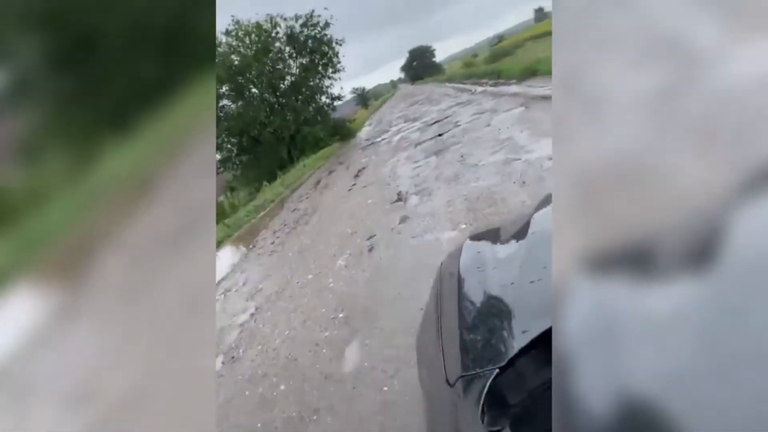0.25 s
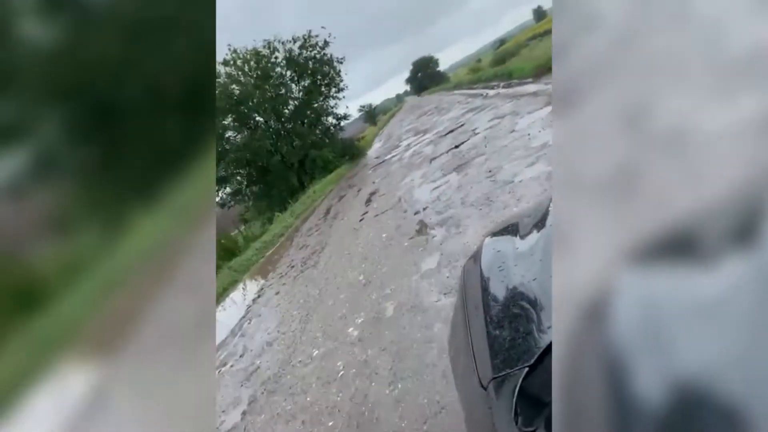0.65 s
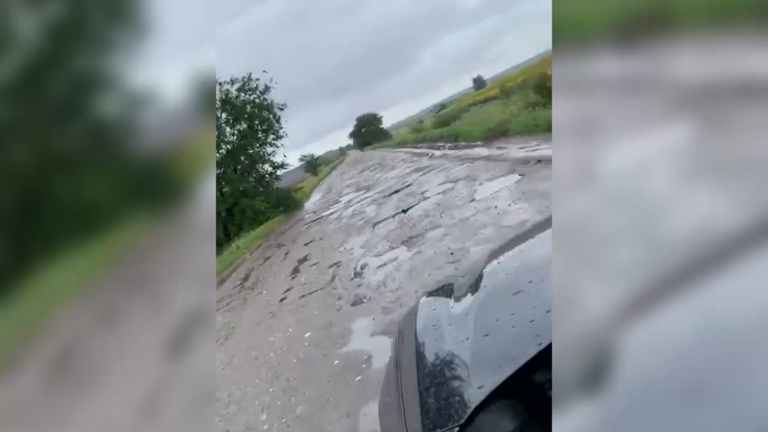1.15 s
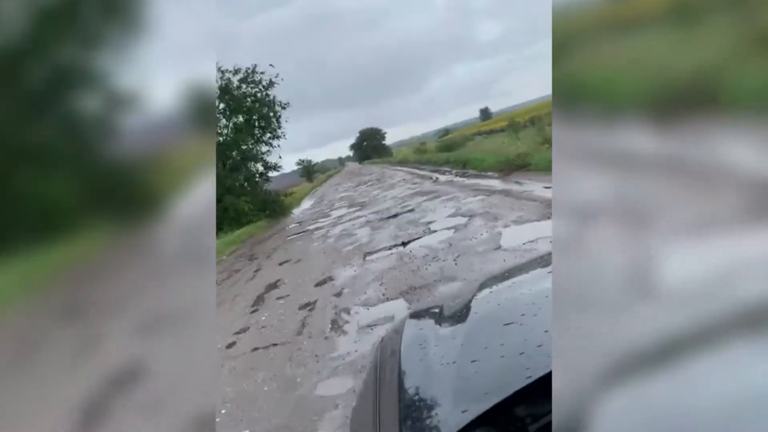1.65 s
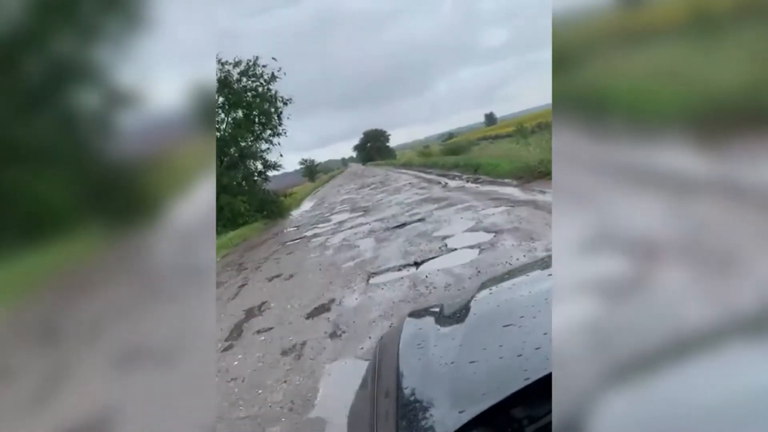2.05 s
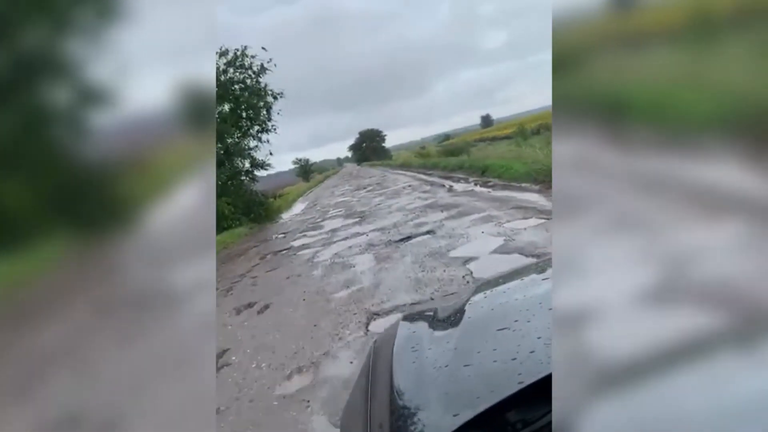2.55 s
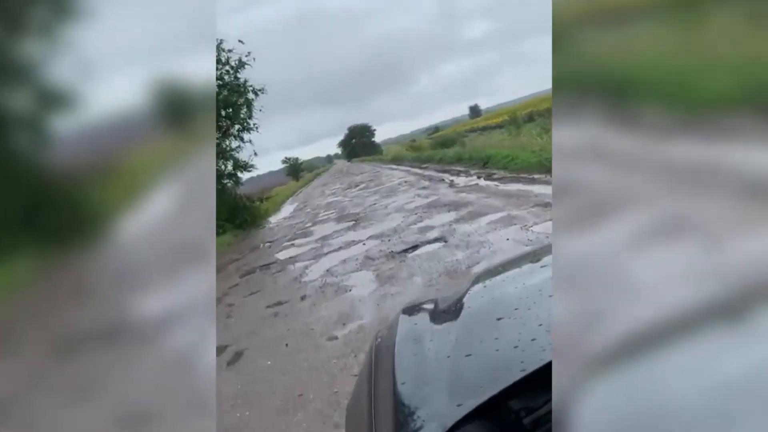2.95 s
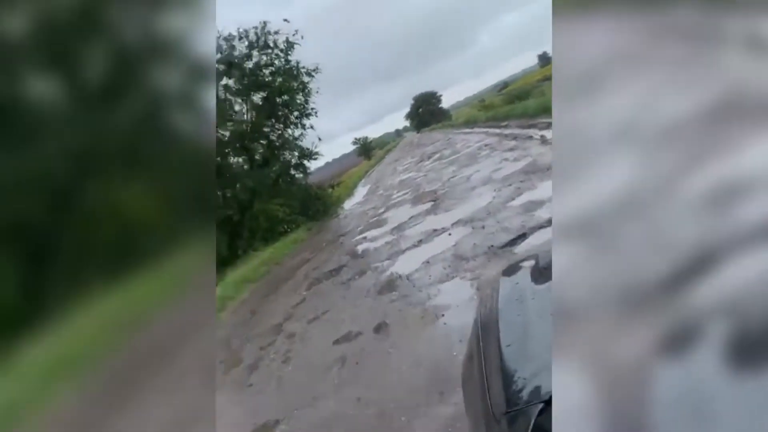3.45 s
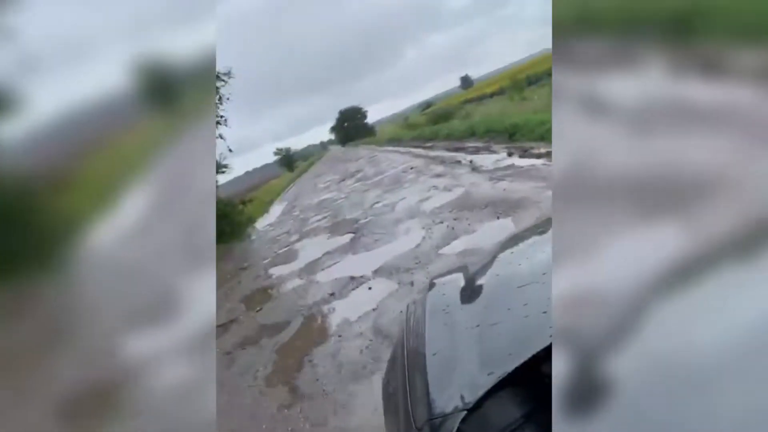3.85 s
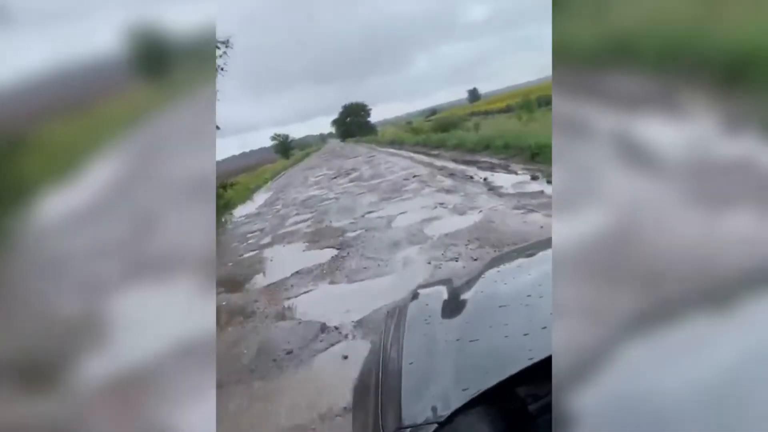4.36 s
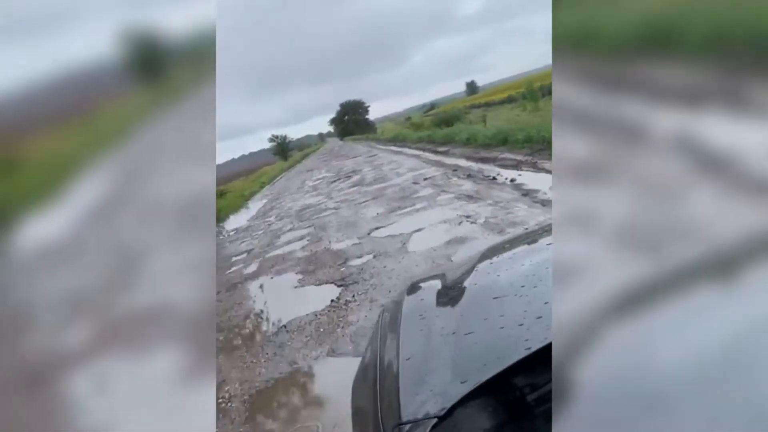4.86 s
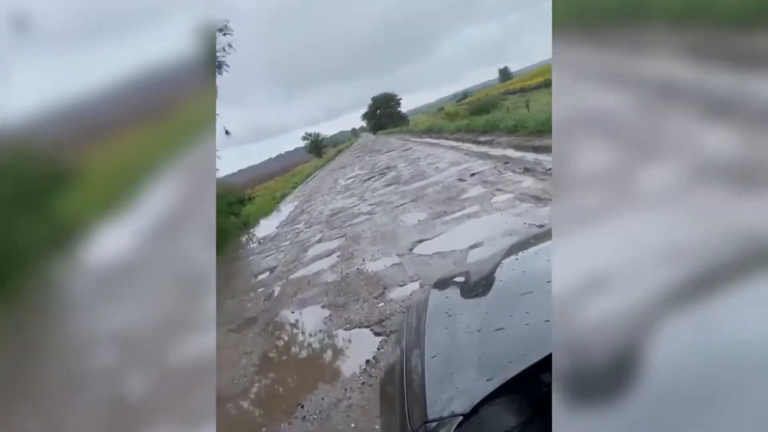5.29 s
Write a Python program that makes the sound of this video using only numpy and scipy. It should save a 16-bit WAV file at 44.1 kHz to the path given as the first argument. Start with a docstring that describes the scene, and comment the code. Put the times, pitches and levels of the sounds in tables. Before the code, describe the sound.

A car rolls slowly over a broken, wet road, heard outdoors and dry from one microphone close to the bodywork. A deep body and wind rumble and dull tyre drone run throughout, with fine gritty crunching, ticking pebbles and a very faint watery hiss. At 0.3 s a very loud, bright knock snaps through the sheet metal, followed at 0.4 s by a duller thump; another hollow thud comes at 1 s. From 1.1 to 2.2 s it is mostly rolling with light taps. Softer low bumps and stone clicks start at 2.3 s, and grit and small squelches thicken around 2.7-3 s. A deep boom at 3.2 s leads to a dense, clattering burst of knocks, stones and spray at 3.4-3.55 s. Then it calms, with modest bumps at 3.9 and 4.3 s and quiet rolling, until heavy booming thuds at 5.3 and 5.5 s.

```python
"""A car creeps over a wet, broken road, heard from one microphone held outside, close to the bodywork.
Body and wind rumble and the tyre drone are coloured noise; the treads crunch on grit (noise, ticks and pips),
hiss on the water film and throw spray (noise). Blows and stones reach the microphone through the sheet metal
as bending waves, treble first, so each lands as a quick falling chirp. Swinging parts boom as decaying sines;
water squelches from hollows as resonant noise."""
import sys
import numpy as np
from scipy import signal
from scipy.fft import rfft, irfft, next_fast_len
from scipy.io import wavfile
from scipy.ndimage import uniform_filter1d, map_coordinates

SR = 44100
rng = np.random.default_rng(int(sys.argv[2]) if len(sys.argv) > 2 else 0)


def generate_wav(signal):
    """Clip the signal to [-1, 1] and save it as 16-bit WAV at the path in sys.argv[1]."""
    frames = np.transpose(np.atleast_2d(signal))
    scaled = np.clip(frames, -1, 1) * 32767
    pcm = np.round(scaled).astype(np.int16)
    wavfile.write(sys.argv[1], SR, pcm)


N = 243608

# how hard the road shakes the car: [t/s, shake level/dB]
ROAD_SHAKE = [(0.0, -43.5), (0.57, -43.5), (1.03, -37), (2.37, -37), (2.83, -33), (4.17, -42.5),
              (4.44, -39.5), (5.22, -39.5), (5.5, -35)]
# looseness of the surface under the tyres: [t/s, grit level before trim/dB]
SURFACE = [(0.0, -53), (0.32, -60), (0.47, -56), (2.32, -52.5), (2.77, -46.5), (3.0, -48.5), (3.21, -56.5),
           (3.4, -47.5), (3.55, -45), (3.71, -52.5), (4.18, -57.5), (4.42, -54), (4.6, -57), (5.24, -54),
           (5.28, -48.5), (5.47, -56), (5.52, -44)]
# the film of water under the tread: [t/s, hiss level before flicker/dB]
WETNESS = [(0.0, -77.5), (0.75, -77.5), (1.6, -79), (1.8, -74), (2.55, -74), (2.8, -69.5), (3.26, -72),
           (3.45, -73.5), (3.6, -70), (3.82, -78.5), (4.25, -78), (4.4, -73), (4.72, -77), (4.93, -70),
           (5.23, -80), (5.35, -66), (5.52, -68)]
# relative spectra of the rolling layers: [f/Hz, level per Hz/dB]
RUMBLE_SPECTRUM = [(11, -34), (18, -9), (43, 1), (70, -9), (110, -17), (140, -37.5), (240, -120)]
DRONE_SPECTRUM = [(45, -24), (75, -2.5), (110, -1), (200, -9.5), (300, -15.5), (450, -25.5), (650, -40),
                  (1000, -49.5)]
GRIT_SPECTRUM = [(300, -1.5), (550, 0), (800, -4.5), (1300, -1), (1700, -5.5), (2200, -9), (2700, -19.5),
                 (3300, -22), (4100, -29), (4800, -42.5), (7000, -48.5)]
HISS_SPECTRUM = [(1500, -30.5), (3000, 1), (4100, 4), (4700, -3.5), (5500, -5.5), (6400, -5.5),
                 (7100, -12.5), (8500, -15), (10500, -26.5), (13000, -42)]
SPRAY_SPECTRUM = [(1500, -30), (3000, 7), (4200, 1.5), (5200, -6.5), (6500, -8.5), (8500, -14.5),
                  (10500, -25), (13000, -38.5)]
# water and grit thrown from puddles, bell-shaped in time:
# [t of the peak/s, half length/s, spray level/dB, grit level/dB], both before flicker
SPLASHES = [(0.199, 0.054, -65, -50), (0.385, 0.072, -63, -51.5), (0.68, 0.02, -88, -53.5),
            (0.812, 0.013, -79, -47.5), (0.875, 0.022, -76, -51), (0.98, 0.048, -70, -55),
            (1.282, 0.056, -92, -53), (1.6, 0.01, -92, -52), (1.998, 0.029, -73, -56),
            (2.16, 0.0068, -63, -52.5), (2.703, 0.013, -81, -46), (2.808, 0.017, -65, -48),
            (2.936, 0.011, -73, -43.5), (3.13, 0.12, -68, -50), (3.413, 0.0073, -60, -38),
            (3.457, 0.02, -69, -49), (3.533, 0.014, -61.5, -43.5), (3.573, 0.015, -74, -52),
            (3.701, 0.015, -78, -42), (3.971, 0.078, -68, -52), (4.13, 0.029, -72.5, -55),
            (4.294, 0.0069, -59, -42.5), (4.347, 0.026, -72, -50), (4.465, 0.013, -78, -53),
            (4.876, 0.039, -80, -52), (5.067, 0.012, -82, -51.5), (5.333, 0.01, -63, -45),
            (5.42, 0.043, -78, -48), (5.491, 0.003, -60, -49)]
# the wheel goes light for a moment: [t of the middle/s, half length/s]
LIFT = (3.355, 0.028)
# wheels strike pothole edges: [t/s, peak level/dB, hardness corner f/Hz, crunch level/dB,
# crunch length/s, travel to the microphone at 1 kHz/s]
BLOWS = [ (0.2722, -3.5, 1550, -33, 0.081, 0.0034), (0.3836, -9, 358, -18.5, 0.043, 0.0029),
         (0.3944, -17.5, 450, -27, 0.016, 0.0029), (0.409, -20.5, 350, -35, 0.011, 0.0029),
         (0.547, -42, 600, -37, 0.008, 0.003), (0.798, -35.5, 600, -38, 0.085, 0.003),
         (0.916, -33.5, 500, -32, 0.033, 0.0035), (0.981, -20, 298, -24.5, 0.063, 0.0041),
         (1.176, -31, 700, -44.5, 0.068, 0.0028), (1.234, -28, 1430, -42, 0.032, 0.0022),
         (1.641, -43, 453, -44, 0.011, 0.003), (2.086, -47, 450, -51, 0.011, 0.003),
         (2.279, -35, 400, -39, 0.049, 0.003), (2.412, -17, 156, -49, 0.035, 0.0031),
         (2.653, -19, 178, -29, 0.024, 0.0031), (2.713, -22.5, 200, -28.5, 0.014, 0.0031),
         (2.787, -35, 1100, -33, 0.013, 0.0031), (2.791, -20, 120, -30, 0.024, 0.00294),
         (3.02, -35, 1320, -28, 0.012, 0.0024), (3.076, -39, 900, -37, 0.066, 0.0028),
         (3.178, -34, 600, -24, 0.018, 0.0029), (3.183, -19.5, 480, -31, 0.0069, 0.0021),
         (3.31, -31, 350, -38, 0.019, 0.003), (3.408, -21, 500, -16.5, 0.015, 0.0026),
         (3.4132, -12, 486, -19, 0.034, 0.0031), (3.418, -17.5, 1000, -38.5, 0.0093, 0.002785),
         (3.427, -15.5, 407, -34, 0.027, 0.00293), (3.505, -23, 1400, -33, 0.035, 0.0027),
         (3.5255, -26, 304, -21.5, 0.013, 0.00318), (3.541, -31, 1000, -35, 0.015, 0.003),
         (3.902, -29.5, 554, -30, 0.041, 0.0036), (3.922, -29, 500, -28, 0.059, 0.0031),
         (3.934, -29, 900, -39, 0.015, 0.003), (4.184, -29, 1160, -39.5, 0.06, 0.0026),
         (4.2682, -27.5, 910, -35, 0.018, 0.0024), (4.292, -33, 1200, -40, 0.028, 0.0031),
         (4.814, -43, 795, -36, 0.02, 0.003), (5.327, -25, 745, -23, 0.018, 0.0031),
         (5.332, -23, 750, -30, 0.014, 0.003), (5.339, -17.5, 128, -25.5, 0.028, 0.0034),
         (5.4372, -26.5, 1100, -30, 0.034, 0.0032), (5.493, -17.5, 124, -16, 0.015, 0.003)]
# response of the bodywork: [f/Hz, level/dB]
PANEL = [(15, -18.5), (35, 2.5), (120, 6), (250, 5), (1000, 5), (2000, 1), (2700, -10), (4200, -18.5),
         (8000, -26.5), (12000, -44.5)]
# bending waves return from the panel's edges: [path relative to the direct one, level/dB before treble loss]
REFLECTIONS = [(2.102, -8), (3.3, -12)]
# stones flung against the bodywork: [t/s, peak level/dB, treble tilt/dB per octave]
STONES = [(.2730, -18, 1), (1.6380, -34, -6), (2.3500, -45, 3), (2.4146, -21, 1), (2.6512, -26, -2),
          (2.7425, -28, -3), (2.7835, -29, -2), (2.8215, -31, -2), (2.9400, -37, 2), (2.9540, -33, -1),
          (3.0215, -29, -1), (3.0775, -29, -2), (3.1140, -36, 0), (3.2760, -40, 2), (3.4146, -20, -2),
          (3.4302, -22, 2), (3.4938, -47, 7), (3.5064, -31, 1), (3.5260, -30, 4), (3.5342, -23, 2),
          (4.0310, -36, 0), (4.1200, -36, 0), (4.4625, -36, -2), (5.1200, -45, 4), (5.2650, -32, 1),
          (5.4378, -30, -2), (5.5157, -19, 3)]
# relative spectrum of a stone's chirp before its tilt: [f/Hz, level/dB]
STONE_SPECTRUM = [(40, -21), (200, -10.5), (400, 5), (700, -5.5), (1300, 4), (2000, -6), (2600, -12),
                  (4000, -22), (5500, -28), (8000, -47.5), (12000, -59.5)]
# a jolt sets a part swinging, body, wheel or loose strut: [t/s, peak level/dB, pitch f/Hz]
DROPS = [(0.282, -17.5, 103), (0.299, -19, 40.8), (0.391, -12, 170), (0.4, -26, 42), (0.9866, -16, 256),
         (0.996, -15.5, 43.6), (1.012, -30, 255), (1.153, -31.5, 365), (1.934, -28, 200),
         (2.327, -21.5, 47.4), (2.49, -22.5, 44.2), (2.758, -18.5, 80), (3.02, -19.5, 115),
         (3.084, -25.5, 86), (3.1825, -15.5, 382), (3.192, -8, 40.3), (3.418, -17.5, 138),
         (3.4207, -11.5, 220), (3.4204, -17.5, 328), (3.424, -9.5, 40.8), (3.531, -17.5, 326),
         (3.533, -16.5, 84), (3.924, -21, 107), (3.963, -22.5, 99), (4.298, -27, 130), (4.342, -20.5, 48),
         (5.338, -18.5, 134), (5.345, -10, 39), (5.498, -13, 105.3), (5.502, -9.5, 59.8)]
# a tyre squeezes water out of a hollow: [t of the peak/s, rms level/dB, half length/s, pitch f/Hz]
SQUELCHES = [(0.973, -46, 0.0013, 1930), (1.912, -46, 0.013, 1580), (2.288, -36, 0.0037, 1440),
             (2.694, -44, 0.0059, 1900), (2.72, -46, 0.0084, 1550), (2.743, -37, 0.0018, 1400),
             (2.803, -41.5, 0.0052, 1750), (2.807, -38, 0.011, 1220), (2.958, -41.5, 0.002, 1700),
             (3.093, -42.5, 0.0081, 1330), (3.141, -38.5, 0.0017, 1310), (3.33, -46.5, 0.0062, 1400),
             (3.401, -38.5, 0.0023, 1940), (4.05, -44, 0.0023, 1180), (4.065, -42, 0.0027, 1170),
             (4.197, -42, 0.009, 1010), (4.313, -47.5, 0.0092, 1400), (4.854, -48.5, 0.0037, 1250),
             (5.082, -47, 0.0036, 1040), (5.322, -39.5, 0.0021, 1350), (5.398, -50.5, 0.066, 2050)]

DRONE_DB = 0.5  # over the shake
RUMBLE_DB, RUMBLE_FOLLOWS = 7.0, 0.43  # over the mean shake; share of the shake's swing in dB
GRIT_DB = -1.02  # trim on the surface level
LIFT_HISS_DB, LIFT_GRIT_DB = -8, -6.5  # change under a light wheel
# unevenness: grit follows the bumps, flickers and flares in spots; water flickers too
GRIT_BUMP_DB, GRIT_FLICKER_DB, GRIT_PATCHY_DB, WATER_FLICKER_DB = 0.9, 1.25, 2.9, 1.2
TRAVEL_S = 0.0031  # grit, from wheel to microphone at 1 kHz
# grit popping under the tread: pops a second, middle pitch, full range of pitch
POP_RATE, POP_HZ, POP_SPREAD_OCTAVES = 130, 1604, 1
POP_CYCLES, POP_DB = 4.0, -10  # a pop peaks after half these cycles; level against the grit noise
# water thrown by a blow: level against its crunch, lag and half length
BLOW_SPRAY_DB, BLOW_SPRAY_LAG_S, BLOW_SPRAY_HALF_S = -56, 0.0088, 0.013
RATTLE_RATE = 420  # mean contacts a second of loose parts after a blow
BODY_HZ = 42.7  # the body's swing; higher parts ring for more cycles
TOP_HZ = 11900  # band limit of the recorder


def amp(db):
    """Decibels to gain."""
    return 10 ** (np.asarray(db) / 20)


def unit(x):
    """Scale to rms 1."""
    return x / np.sqrt(np.mean(x ** 2) + 1e-20)


def colour(points, hz):
    """Gain of (Hz, dB) points joined on a log axis, -120 dB beyond the ends."""
    f, db = np.transpose(points)
    return amp(np.interp(np.log(hz + 1), np.log(f + 1), db, left=-120, right=-120))


def filtered(x, response):
    """x through a complex response of frequency."""
    m = next_fast_len(len(x) + 8192)  # padding keeps the tail from wrapping round
    return irfft(rfft(x, m) * response(np.fft.rfftfreq(m, 1 / SR)), m)[:len(x)]


def noise(points):
    """Coloured noise of rms 1."""
    return unit(filtered(rng.standard_normal(N), lambda hz: colour(points, hz)))


def wobble(rate):
    """A smooth random curve, rate knots a second."""
    knots = rng.standard_normal(int(N * rate / SR) + 4)
    return map_coordinates(knots, [np.arange(N) * rate / SR])


def curve(rows):
    """A two-column table as one value per sample."""
    s, values = np.transpose(rows)
    return np.interp(np.arange(N) / SR, s, values)


def swell(s, half):
    """A bell-shaped rise and fall around time s; half is its standard deviation."""
    return np.exp(-((np.arange(N) / SR - s) / half) ** 2 / 2)


def add(track, s, sound):
    """Mix a sound into the track from time s on."""
    room = track[max(round(s * SR), 0):][:len(sound)]
    room += sound[:len(room)]


def patchy(x, depth_db):
    """Shifting contact makes short spots of the spectrum flare and fade; rms 1."""
    z = signal.stft(x, nperseg=512)[2]
    field = uniform_filter1d(rng.standard_normal(z.shape), size=4, axis=0)  # across frequency
    field = uniform_filter1d(field, size=3, axis=1)  # across time
    return unit(signal.istft(z * amp(depth_db * unit(field)), nperseg=512)[1][:N])


def bending(hz, travel):
    """Phase of a bending wave: its delay is travel at 1 kHz and goes as 1 / sqrt(f)."""
    return np.exp(-4j * np.pi * travel * np.sqrt(1000 * hz))


def rumble(shake_db):
    """Low body and wind noise that swings less than the road's shake."""
    mean_db = shake_db.mean()
    level_db = RUMBLE_DB + mean_db + RUMBLE_FOLLOWS * (shake_db - mean_db)
    return amp(level_db) * noise(RUMBLE_SPECTRUM)


def drone(shake_db, bumps):
    """Tyre noise that follows the shake, the small bumps and a slower drift of its own."""
    return amp(shake_db + DRONE_DB + 1.4 * bumps + 1.0 * wobble(14)) * noise(DRONE_SPECTRUM)


def pebbles(rate, spread_db, travel):
    """Small stones of random size tick against the car and reach us as bending waves."""
    count = int(rate * N / SR)
    where, size, sign = rng.random((count, 3)).T
    # many small ones, few large
    sizes = amp(-spread_db * np.log(np.maximum(size, .04))) * np.sign(sign - .5)
    ticks = np.bincount((where * N).astype(int), sizes, N)
    return unit(filtered(ticks, lambda hz: colour(GRIT_SPECTRUM, hz) * bending(hz, travel)))


def pops(spread_db):
    """Wet grit pops out from under the tread: brief pips, each with its own pitch and size."""
    track, t = np.zeros(N), np.arange(SR // 40) / SR
    for where, size, pitch in rng.random((int(POP_RATE * N / SR), 3)):
        cycles = t * POP_HZ * 2 ** (POP_SPREAD_OCTAVES * (pitch - .5))
        life = cycles / POP_CYCLES
        pip = life * np.exp(-2 * life) * np.sin(2 * np.pi * cycles)
        add(track, where * N / SR, amp(spread_db * size ** 2) * pip)
    return unit(track)


def grit(bumps):
    """Fine sand is a shifting hiss, coarse stones tick one by one, wet grit pops; puddles throw more."""
    crunch = patchy(noise(GRIT_SPECTRUM), GRIT_PATCHY_DB)
    crunch += amp(-3) * pebbles(rate=340, spread_db=2.5, travel=TRAVEL_S)
    crunch += amp(POP_DB) * pops(spread_db=12.5)
    rolled = amp(curve(SURFACE) + GRIT_DB + LIFT_GRIT_DB * swell(*LIFT) + GRIT_BUMP_DB * bumps)
    thrown = sum(amp(grit_db) * swell(s, half) for s, half, _, grit_db in SPLASHES)
    return np.hypot(rolled, thrown) * amp(GRIT_FLICKER_DB * wobble(90)) * crunch


def hiss():
    """The water film hisses under the tread, less while the wheel is light."""
    return amp(curve(WETNESS) + LIFT_HISS_DB * swell(*LIFT)) * patchy(noise(HISS_SPECTRUM), depth_db=3.2)


def spray():
    """Water thrown from puddles, and by each blow a moment after it."""
    puddles = sum(amp(water_db) * swell(s, half) for s, half, water_db, _ in SPLASHES)
    jolts = sum(amp(crunch_db) * swell(s + BLOW_SPRAY_LAG_S, BLOW_SPRAY_HALF_S)
                for s, _, _, crunch_db, _, _ in BLOWS)
    return (puddles + amp(BLOW_SPRAY_DB) * jolts) * patchy(noise(SPRAY_SPECTRUM), depth_db=2.0)


def rolling():
    """All layers of the rolling car; the same small bumps shake drone and grit."""
    shake_db = curve(ROAD_SHAKE)
    bumps = wobble(32)
    water = amp(WATER_FLICKER_DB * wobble(130)) * (hiss() + spray())
    return rumble(shake_db) + drone(shake_db, bumps) + grit(bumps) + water


def wave(spectrum):
    """A short wave of peak 1 from its complex spectrum, eased in and out."""
    x = irfft(spectrum)
    k = np.arange(len(x))
    x = x * np.minimum(k / 30, 1) * np.cos(np.pi / 2 * k / len(x))
    return x / np.abs(x).max()


def rattle(size):
    """An uneven run of small contacts, each with its own strength and direction."""
    gap, strength, sign = rng.random((size // 30, 3)).T
    at = (np.cumsum(.5 + gap) * SR / RATTLE_RATE).astype(int)
    return np.bincount(at, (.5 + strength) * np.sign(sign - .5), size)[:size]


def knocks(crunch_bright, echo_hz):
    """Each blow chirps down through the bodywork, with a short rattle; soft blows lack treble."""
    track, t = np.zeros(N), np.arange(SR // 5) / SR
    hz = np.fft.rfftfreq(len(t), 1 / SR)
    panel = colour(PANEL, hz)
    for s, db, corner_hz, crunch_db, length, travel in BLOWS:
        direct = bending(hz, travel)
        # the low waves best survive the trip to an edge and back
        echoes = sum(amp(loss_db) * bending(hz, path * travel) for path, loss_db in REFLECTIONS)
        echoes = echoes / (1 + (hz / echo_hz) ** 2)
        chirp = wave(panel / (1 + (hz / corner_hz) ** 3.11) * (direct + echoes))
        # loose stones and parts: no deep bass, duller after a soft blow
        crunch_hz = crunch_bright * min(corner_hz, 700)
        loose = panel * hz / (hz + 120) / (1 + (hz / crunch_hz) ** 1.68)
        crunch = unit(irfft(rfft(rattle(len(t))) * loose * direct))
        hump = t * np.exp(-(2 * t / length) ** 2)
        add(track, s, amp(db) * chirp + amp(crunch_db) * hump / hump.max() * crunch)
    return track


def stones(travel):
    """A hard little stone makes one dry, bright chirp in the sheet metal."""
    track = np.zeros(N)
    hz = np.fft.rfftfreq(SR // 10, 1 / SR)
    for s, db, tilt_db in STONES:
        tilt = amp(tilt_db * np.log2(hz + 1))
        add(track, s, amp(db) * wave(colour(STONE_SPECTRUM, hz) * tilt * bending(hz, travel)))
    return track


def booms(ring_cycles, rise_cycles):
    """Body, wheel or strut swings for a few cycles after a jolt."""
    track, t = np.zeros(N), np.arange(SR // 3) / SR
    for s, db, hz in DROPS:
        cycles = hz * t
        rise = 1 - np.exp(-cycles / rise_cycles)
        decay = amp(-60 * cycles / (ring_cycles * np.sqrt(hz / BODY_HZ)))
        swing = np.sin(2 * np.pi * cycles) * rise * decay
        add(track, s, amp(db) * swing / np.abs(swing).max())
    return track


def squelches(sharpness):
    """Short swells of noise that resonate in the gap between tread and road."""
    track = np.zeros(N)
    for s, db, half, pitch_hz in SQUELCHES:
        def gap(hz):
            """Resonance at the pitch, heard by way of the bodywork."""
            detune = hz / pitch_hz - pitch_hz / (hz + 1)
            return colour(PANEL, hz) / (1 + 1j * sharpness * detune)
        track += amp(db) * swell(s, half) * unit(filtered(rng.standard_normal(N), gap))
    return track


def scene():
    """Everything meets at one microphone."""
    blows = knocks(crunch_bright=0.21, echo_hz=382) + stones(travel=0.00272)  # travel in s at 1 kHz
    swings = booms(ring_cycles=4.05, rise_cycles=0.25)  # cycles of the body to fall 60 dB; cycles to rise
    return (rolling() + blows + swings + squelches(sharpness=6.8))[None]


def record(dry):
    """The recorder keeps nothing above its band limit."""
    return np.array([filtered(channel, lambda hz: hz < TOP_HZ) for channel in dry])


dry = scene()
out = record(dry)
generate_wav(out)
```